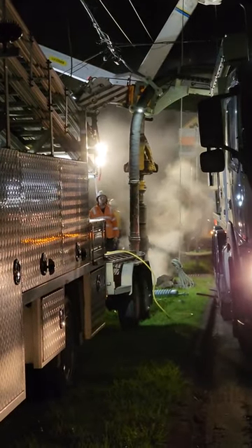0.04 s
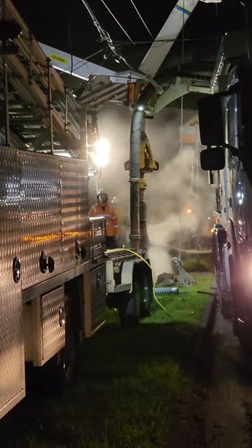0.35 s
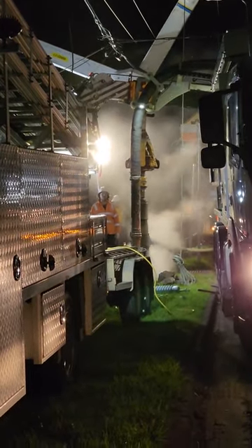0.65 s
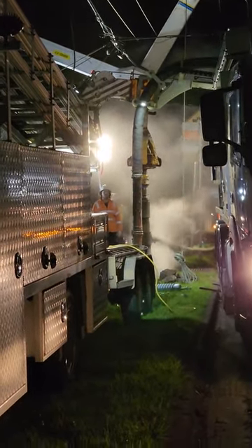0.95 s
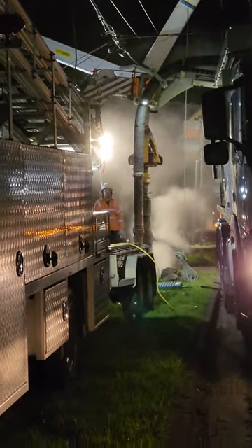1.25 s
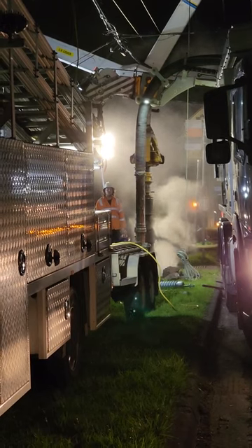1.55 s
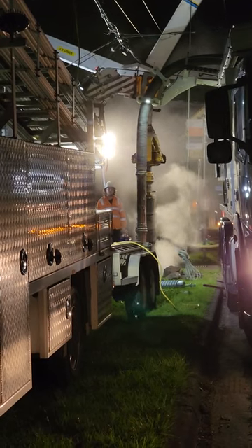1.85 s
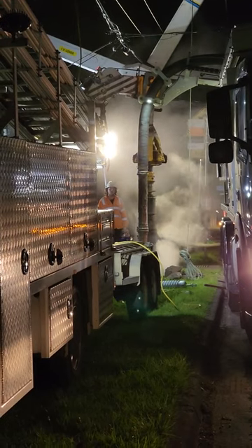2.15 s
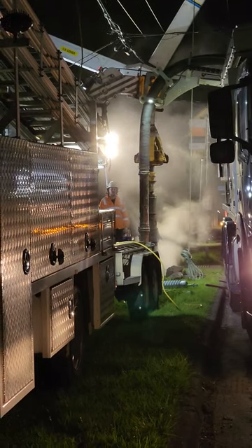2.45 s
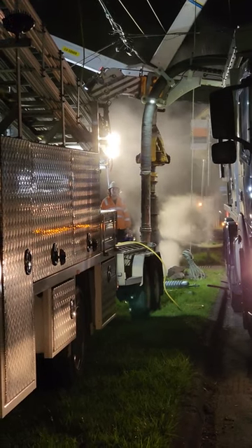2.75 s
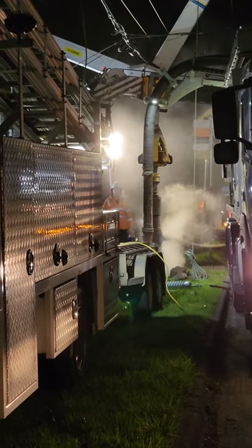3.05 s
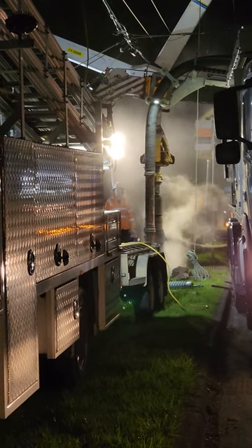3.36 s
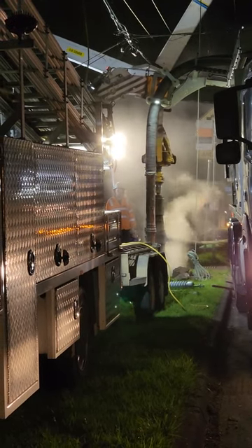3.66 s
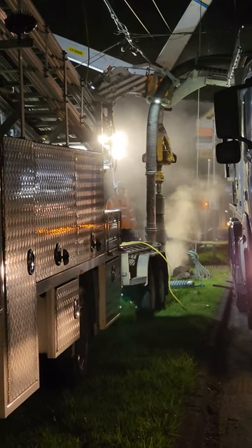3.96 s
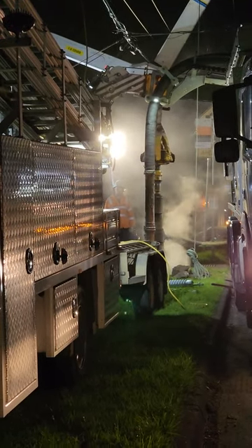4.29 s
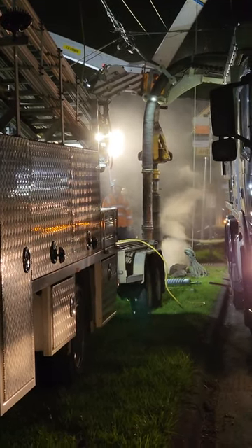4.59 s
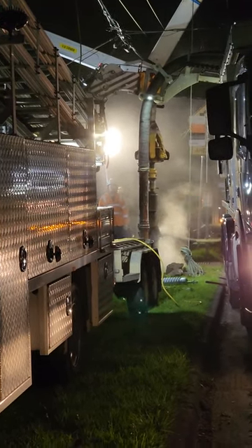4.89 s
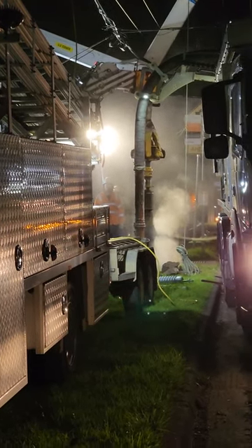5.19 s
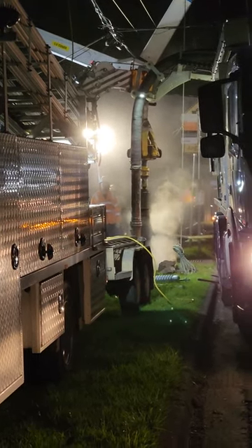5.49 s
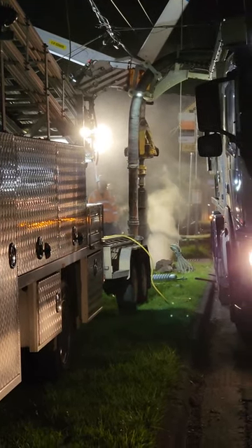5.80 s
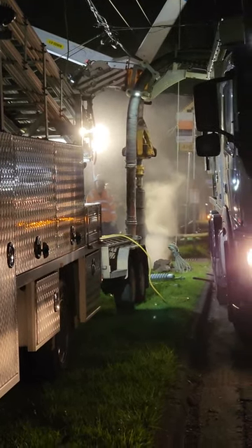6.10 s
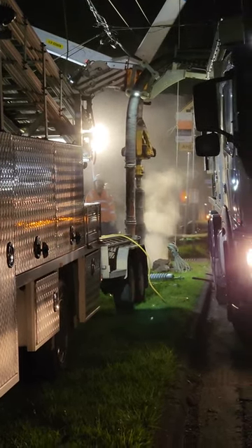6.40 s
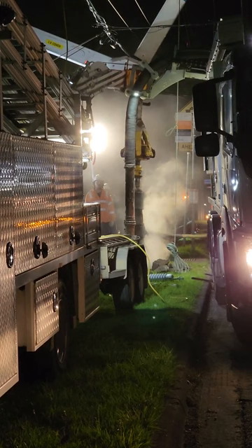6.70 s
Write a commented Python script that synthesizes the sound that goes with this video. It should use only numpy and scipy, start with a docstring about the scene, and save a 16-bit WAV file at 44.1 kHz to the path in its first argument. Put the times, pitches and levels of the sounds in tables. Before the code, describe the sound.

An air-powered hammer drill pounds a steel pipe into the ground for the whole seven seconds, about nine blows a second. Each blow is a deep, punchy thump of air with a short, bright steel clang, a dull knock and a rattle of loose parts. The pace is nearly even, with slight drags, while the clangs vary in strength: strong in the first second, mostly lighter until 2 seconds, hardest from about 2.4 to 3.2, lighter again around 4 to 5.3, then stronger. Faint high clinks come near 0.7, 2.4 and 4.3 seconds, and the drill rod sometimes rings thinly. Compressed air hisses constantly over a steady engine rumble with a faint wavering whine. A soft roar of air blowing out rock chips swells from about 5.5 seconds, peaking near 6.3. The microphone is outdoors between two trucks, with short echoes and slight overload on the loudest thumps.

```python
"""Deep thumps and steel clangs, about nine a second, over hissing air and a rumbling engine.
An air-powered hammer drill is driving a steel casing (a wide pipe) into the ground between two trucks.
Each stroke lets out a puff of air, strikes the steel and puffs again as the piston returns.
The blows set the drill's collar and rod ringing and shake loose parts, while air flushes out the hole.
The loudest puffs overload the microphone."""
import sys
import numpy as np
from scipy import signal
from scipy.fft import rfft, irfft, next_fast_len
from scipy.io import wavfile
from scipy.ndimage import uniform_filter1d, map_coordinates

SR = 44100
rng = np.random.default_rng(int(sys.argv[2]) if len(sys.argv) > 2 else 0)


def master_out(mix):
    """Clip the mix to full scale and print it as 16-bit PCM to the path in sys.argv[1]."""
    frames = np.transpose(np.atleast_2d(mix))
    ceiling = np.clip(frames, -1, 1)
    pcm = np.round(ceiling * 32767).astype(np.int16)
    wavfile.write(sys.argv[1], SR, pcm)


N = 301644

# the piston's blows on the steel: t/s, strength/dB
BLOWS = [(0.0737, -11), (0.193, -8), (0.3037, -11), (0.4214, -18), (0.5362, -8), (0.6544, -16),
         (0.7701, -10), (0.8829, -19), (0.9951, -10), (1.1343, -18), (1.2635, -21), (1.3828, -21),
         (1.4915, -14), (1.6057, -8), (1.7205, -25), (1.8362, -21), (1.9464, -23), (2.0592, -16),
         (2.1745, -15), (2.2842, -13), (2.3984, -8), (2.5117, -12), (2.6314, -14), (2.7442, -12),
         (2.8574, -7), (2.9761, -9), (3.0884, -10), (3.2051, -7), (3.3468, -21), (3.4615, -18),
         (3.5982, -10), (3.7254, -12), (3.8601, -21), (3.9734, -10), (4.0804, -27), (4.1969, -21),
         (4.3121, -18), (4.4483, -9), (4.5614, -19), (4.6798, -25), (4.7935, -21), (4.9054, -20),
         (5.0384, -21), (5.1711, -16), (5.2834, -24), (5.3946, -7), (5.5034, -12), (5.6191, -10),
         (5.7514, -23), (5.8704, -21), (5.9893, -12), (6.1005, -14), (6.2068, -12), (6.3215, -8),
         (6.4602, -20), (6.5735, -10), (6.6902, -17), (6.8009, -21)]
def strokes(usual_db=-13, slow_s=.124):
    """Each blow's time, dB above a usual blow, and whether trapped air cushioned (slowed) the piston."""
    s, db = np.transpose(BLOWS)
    return zip(s, db - usual_db, np.diff(s, prepend=s[0]) > slow_s)


def puff(t, end_hz, peak_s, start_hz=164, glide_s=0.0057):
    """A burst of air whose pitch sinks as its pressure is spent."""
    cycles = end_hz * t + (start_hz - end_hz) * glide_s * (1 - np.exp(-t / glide_s))
    return np.sin(2 * np.pi * cycles) * swell(t, peak_s)


# notes of the air in the drill's exhaust pipe: f/Hz, level/dB, time to fade by 60 dB/s
AIR_NOTES = [(180, -14, 0.085), (247, -27.5, 0.19), (342.4, -21.5, 0.084)]
# main puff: time before the blow/s, level/dB, final f/Hz, time to peak/s, level of the air notes/dB
FREE_PUFF, CUSHIONED_PUFF = (.0058, -1, 71, .0076, 1), (.011, -2.8, 112, .0092, -7)
# puff of the returning piston: time after the blow/s, level/dB
FREE_RETURN, CUSHIONED_RETURN = (.0375, -5.8), (.041, -3)
def exhaust():
    """Two puffs a stroke, each with a gush of swirling air and an echo from a truck side."""
    t = np.arange(SR // 6) / SR
    air, gush, echo = np.zeros((3, N))
    boom = sum(amp(db - 60 * t / t60) * np.sin(2 * np.pi * hz * t) for hz, db, t60 in AIR_NOTES)
    boom *= rise(t, 0.0021)
    for s, _, cushioned in strokes():
        lead_s, db, hz, peak_s, boom_db = CUSHIONED_PUFF if cushioned else FREE_PUFF
        return_s, return_db = CUSHIONED_RETURN if cushioned else FREE_RETURN
        out, back = amp(db + rng.normal(0, .8)), amp(return_db + rng.normal(0, 1.3))
        add(air, s - lead_s, out * puff(t, hz * rng.normal(1, .03), peak_s))
        add(air, s - lead_s + 0.0021, out * amp(boom_db) * boom)
        add(air, s + return_s, back * puff(t, end_hz=45, peak_s=0.0075))
        add(gush, s - lead_s, out * swell(t, peak_s=0.0089))
        add(gush, s + return_s, back * swell(t, peak_s=0.0045))
    add(echo, .018, 0.4 * air)
    swirl = rush([(40, -33), (170, 4.5), (350, -5.5), (520, -17.5), (1500, -65)], patchy_db=2)
    return air + echo + amp(-21) * gush * swirl


def hits(usual_db, growth, cushion_db):
    """Each blow's time, gain and cushioning for one part, which gains `growth` dB per dB of force."""
    for s, force_db, cushioned in strokes():
        yield s, amp(usual_db + growth * force_db + cushion_db * cushioned), cushioned


def clang(t, hz, t60=0.034):
    """One clang: the casing's main note and three close neighbours, all dying fast."""
    note = np.zeros(len(t))
    for ratio, db in [(1, 4.5), (0.87, -6), (1.055, -9.5), (0.91, -15)]:
        gain = amp(db + rng.normal(0, 2.7))
        cycles = hz * ratio * rng.normal(1, 0.0068) * t + rng.random() / 2
        note += gain * np.sin(2 * np.pi * cycles)
    note *= amp(-60 * t / t60) * rise(t, 0.001)
    return note / np.linalg.norm(note)


def casing(free_hz=2335, cushioned_hz=2255):
    """The casing clangs at each blow and again, more softly, on the rebound."""
    t = np.arange(SR // 10) / SR
    out = np.zeros(N)
    for s, gain, cushioned in hits(usual_db=6.5, growth=1, cushion_db=.5):
        hz = (cushioned_hz if cushioned else free_hz) * rng.normal(1, .018)
        add(out, s - .0005, gain * clang(t, hz))
        add(out, s + rng.uniform(.003, .009), gain * amp(-10) * clang(t, hz))
    return out


# how firmly the bit sits on the rock, sending more shock up to collar and loose parts: t/s, level/dB
BITE = [(0, 2.5), (.6, -1), (2.05, -1.5), (2.33, 2), (2.8, 0), (3.5, -2), (4, -.5), (4.45, 3), (4.75, -1.5),
        (5.5, -1), (6.1, 1.5), (6.84, 0)]
# the steel collar's notes: f/Hz
COLLAR_HZ = [5530, 5340, 7381, 4387]
# the same notes, in order: level/dB, time to fade by 60 dB/s
COLLAR_FADES = [(3.5, 0.08), (-.5, 0.06), (-7, 0.09), (-7, 0.1)]
def collar():
    """Each blow rings the collar's high notes, at a slightly different phase in each channel."""
    t = np.arange(SR // 10) / SR
    out = np.zeros((2, N))
    for s, gain, _ in hits(usual_db=-28, growth=.7, cushion_db=-2.5):
        strike = gain * amp(1.8 * at_time(BITE, s)) * rise(t, 0.0025)
        for hz, (db, t60) in zip(COLLAR_HZ, COLLAR_FADES):
            phase = rng.uniform(0, 2 * np.pi) + rng.normal(0, 0.36, (2, 1))
            detune = rng.normal(1, 0.002)  # the joint sits a little differently after each blow
            fade = amp(db + rng.normal(0, 2.5) - 60 * t / t60)
            add(out, s, strike * fade * np.sin(2 * np.pi * hz * detune * t + phase))
    return out


# blows that bring out one note of the collar: t/s, f/Hz, level/dB
CLINKS = [(.654, 7381, -30), (2.286, 5530, -23), (2.397, 5530, -17), (4.31, 7381, -22.5)]
def clinks():
    """Now and then the bit catches and the collar sings out one high note."""
    t = np.arange(SR // 4) / SR
    out = np.zeros(N)
    for s, hz, db in CLINKS:
        add(out, s, amp(db - 60 * t / 0.1) * np.sin(2 * np.pi * hz * t) * rise(t, 0.0024))
    return out


# tone colour of loose steel: f/Hz, relative level/dB
RATTLE_COLOUR = [(500, -25), (950, 3), (1200, -8.5), (1450, 8.5), (1700, -2.5), (2300, 8.5), (3400, -5.5),
                 (4300, 0.5), (4700, -5.5), (5350, 1), (6200, -8.5), (7600, -8), (10000, -24.5),
                 (12000, -13), (16000, -23)]
def rattle():
    """Each blow shakes loose parts into a short burst of chattering noise."""
    t = np.arange(SR // 10) / SR
    burst = amp(-60 * t / 0.09) * rise(t, 0.003)
    shake = np.zeros(N)
    for s, gain, _ in hits(usual_db=-17.8, growth=.33, cushion_db=-6):
        add(shake, s - .003, gain * amp(at_time(BITE, s)) * burst)
    chatter = unit(amp(1.16 * wobble(600)))
    return shake * chatter * rush(RATTLE_COLOUR, patchy_db=2)


# how freely the drill rod sings as it turns: t/s, relative level/dB
ROD_LEVELS = [(0.07, -51), (0.34, -45), (0.57, -52), (0.71, -38), (1.15, -45), (1.18, -52), (2.77, -41),
              (3.03, -54), (3.64, -54), (4.34, -42), (4.39, -53), (4.63, -46), (4.97, -54), (5.9, -46),
              (6.02, -54), (6.22, -46), (6.34, -54), (6.8, -47)]
def rod(hz=2786, boost_db=24):
    """The long rod takes up its wavering note slowly and holds it into the next blow."""
    t = np.arange(SR // 3) / SR
    ring = amp(-60 * t / 0.21) * rise(t, 0.02) ** 2
    level = np.zeros(N)
    for s, _, _ in strokes():
        add(level, s, amp(boost_db + at_time(ROD_LEVELS, s)) * ring)
    flicker = unit(amp(2.9 * wobble(90)))
    return level * flicker * np.sin(2 * np.pi * hz * np.arange(N) / SR + wobble(35))


def knock():
    """The hollow casing answers with a dull knock just after each blow."""
    t = np.arange(SR // 10) / SR
    level = np.zeros(N)
    for s, gain, _ in hits(usual_db=-30, growth=.18, cushion_db=-3):
        add(level, s + 0.0023, gain * swell(t, peak_s=0.012))
    return level * rush([(500, -18), (720, -0.5), (950, 3.5), (1080, -9), (1400, -26)], patchy_db=4.5)


# tone colour of the air jet: f/Hz, relative level/dB
HISS_COLOUR = [(330, -5), (580, -8.5), (800, 4), (1150, -10), (1450, -4), (1700, -12), (2300, -4.7),
               (3400, -16), (4700, -17.5), (5300, -12), (6000, -19.5), (7600, -18.5), (10000, -33),
               (11500, -22.5), (15000, -22.5)]
# the fine spray of grit: t/s, relative level/dB
SPRAY_LEVELS = [(0.0, -45), (0.63, -47), (3.24, -43), (3.26, -46), (5.14, -45), (5.22, -52), (5.31, -45),
                (5.64, -46), (6.78, -45), (6.84, -41)]
def flushing_air(split_hz=8000):
    """Air hisses out of the hole without pause; a spray of grit makes the highest part flicker."""
    spray_db = at_time(SPRAY_LEVELS, np.arange(N) / SR)
    jet = rush(HISS_COLOUR, patchy_db=2)
    spray = filtered(jet, lambda hz: 1 / (1 + (split_hz / (hz + 1)) ** 4))
    flicker = amp(spray_db - spray_db.mean() + 0.76 * wobble(400) + 1.1 * wobble(8))
    return amp(-30.2) * (jet - spray + flicker * spray)


# the roar of rock chips blown out of the hole: t/s, level/dB
ROAR_LEVELS = [(0, -35), (.45, -45), (2, -49), (4.7, -41), (5.7, -36), (6.25, -29.5), (6.6, -36.5)]
# tone colour of that roar: f/Hz, relative level/dB
ROAR_COLOUR = [(200, -8), (480, 3.5), (620, -3), (900, 0), (2500, -28)]
def rock_chips():
    """The air roars louder when it lifts more chips."""
    return amp(at_time(ROAR_LEVELS, np.arange(N) / SR)) * rush(ROAR_COLOUR, patchy_db=4.5)


# tone colour of the engine's rumble: f/Hz, relative level/dB
RUMBLE_COLOUR = [(20, -11), (44, 8), (110, -5.5), (175, -2), (215, -14.5), (330, -12.5), (420, -22),
                 (900, -29), (3000, -87)]
# engine and compressor tones: f/Hz, level/dB
WHINES = [(245, -36), (748, -42.5), (1443, -48.5)]
def engine():
    """The engine rumbles steadily under a few wavering tones."""
    t = np.arange(N) / SR
    tones = np.zeros(N)
    for hz, db in WHINES:
        tones += amp(db + 3.1 * wobble(7.4)) * np.sin(2 * np.pi * hz * t + 1.3 * wobble(12))
    return amp(-18.8) * rush(RUMBLE_COLOUR, patchy_db=1.5) + tones


# how long echoes last: f/Hz, time to fade by 60 dB/s
ECHO_FADES = [(300, 0.47), (2500, 0.14), (10000, .16)]
def echoes(x):
    """Sound scatters off the trucks and the rig; low notes linger longest."""
    hz, t, noise = signal.stft(rng.standard_normal((2, SR // 2)), SR, nperseg=256)
    tail = signal.istft(noise * amp(-60 * t / at_pitch(ECHO_FADES, hz)[:, None]), SR, nperseg=256)[1]
    out = np.zeros((2, N))
    add(out, .008, signal.fftconvolve(x, tail / np.linalg.norm(tail[0]), axes=1))
    return out


# which channel is louder: f/Hz, left minus right level/dB
BALANCE = [(200, -.5), (450, -1.5), (850, -5.5), (1450, 9), (1900, -1.5), (2350, 1), (2780, -3.5),
           (3250, 6.5), (4800, -1), (5600, -3.5), (8600, 9), (11500, -5.5), (13500, -6.5), (15500, -2)]
def stereo_colour(x, skew_rad=0.075):
    """Each pitch is louder in one channel or the other; the channels differ slightly in phase."""
    sides = np.array([[1], [-1]])
    def response(hz):
        lean = amp(sides / 2 * at_pitch(BALANCE, hz))
        return np.exp(1j * skew_rad * sides) * lean / np.sqrt(np.mean(lean ** 2, axis=0))
    return filtered(x, response)


# how alike noise is in the two channels: f/Hz, likeness (1 = the same, below 0 = opposed)
LIKENESS = [(200, 1), (750, 0.85), (1200, -0.69), (1600, 0.19), (2300, 0.82), (3100, 0.015), (15000, -0.12)]
def rush(colour, patchy_db):
    """Stereo noise shaped by (f/Hz, level/dB) points, with random louder and softer patches."""
    noise = signal.stft(rng.standard_normal((2, N)), nperseg=512)[2]
    patches = uniform_filter1d(rng.standard_normal(noise.shape[1:]), size=5, axis=0)
    patches = uniform_filter1d(patches, size=12, axis=1)
    pair = signal.istft(noise * amp(patchy_db * unit(patches)), nperseg=512)[1][:, :N]
    width = lambda hz: np.tan(np.arccos(np.clip(at_pitch(LIKENESS, hz), -.7, .995)) / 2)
    mid, side = filtered(pair, lambda hz: amp(at_pitch(colour, hz)) * [np.ones_like(hz), width(hz)])
    return np.array([mid + side, mid - side]) / np.std(mid)


def amp(db):
    """Turn decibels into a gain."""
    return 10 ** (np.asarray(db) / 20)


def unit(x):
    """Scale to an average power of 1."""
    return x / np.sqrt(np.mean(x ** 2) + 1e-20)


def at_time(points, s):
    """Read between (t/s, value) points."""
    return np.interp(s, *np.transpose(points))


def at_pitch(points, hz):
    """Read between (f/Hz, value) points on a log scale."""
    freqs, values = np.transpose(points)
    return np.interp(np.log(hz + 1), np.log(freqs + 1), values)


def rise(t, rise_s):
    """A smooth fade-in from 0 towards 1."""
    return 1 - np.exp(-t / rise_s)


def swell(t, peak_s):
    """A curve that reaches 1 at peak_s and dies away."""
    u = t / peak_s
    return (u * np.exp(1 - u)) ** 1.29


def wobble(rate):
    """A smooth curve through `rate` random values a second."""
    return map_coordinates(rng.standard_normal(int(N * rate / SR) + 4), [np.arange(N) * rate / SR])


def filtered(x, response):
    """Scale each frequency in x by response(hz)."""
    size = next_fast_len(N + SR // 2)
    return irfft(rfft(x, size) * response(np.fft.rfftfreq(size, 1 / SR)), size)[..., :N]


def add(track, s, sound):
    """Mix a sound into a track at time s."""
    start = max(0, round(s * SR))
    part = track[..., start:start + sound.shape[-1]]
    part += sound[..., :part.shape[-1]]


def scene():
    """Hammer, air and engine, heard from between the trucks."""
    steel = casing() + collar() + clinks() + rattle() + rod() + knock()
    hammer = exhaust() + steel + amp(-8.5) * echoes(steel)
    return stereo_colour(hammer + flushing_air() + rock_chips() + engine())


def record(dry, low_hz=27, top_hz=15950, ceiling=.98):
    """The microphone drops the lowest bass, rounds off the peaks and keeps nothing above top_hz."""
    body = filtered(dry, lambda hz: 1 / np.sqrt(1 + (low_hz / (hz + 1)) ** 8))
    rounded = body / (1 + np.abs(body / ceiling) ** 5) ** (1 / 5)
    return filtered(rounded, lambda hz: hz < top_hz)


dry = scene()
out = record(dry)
master_out(out)
```